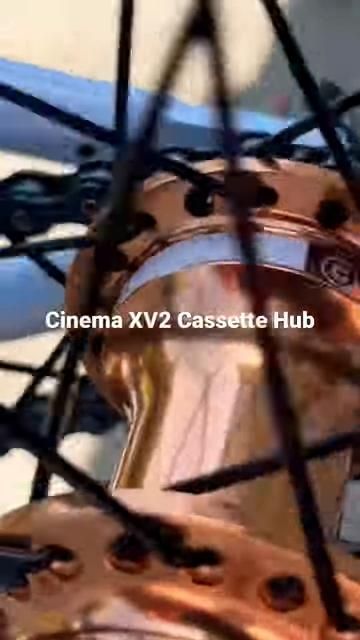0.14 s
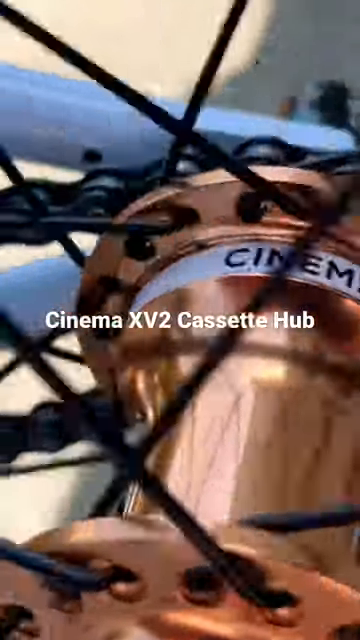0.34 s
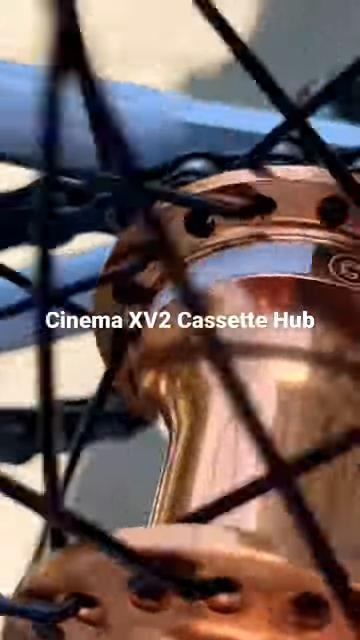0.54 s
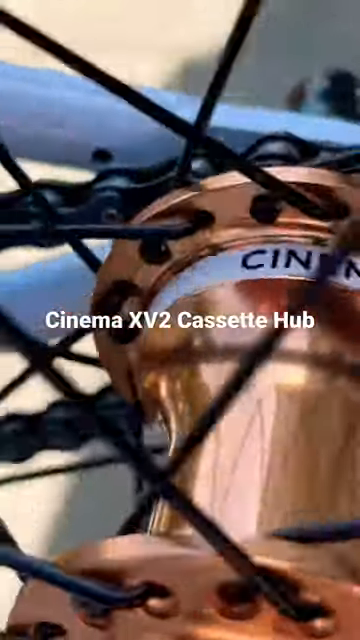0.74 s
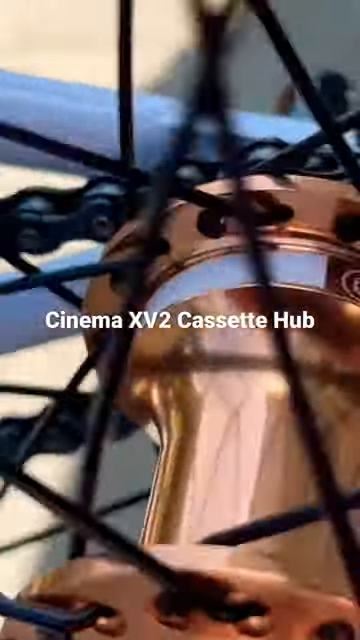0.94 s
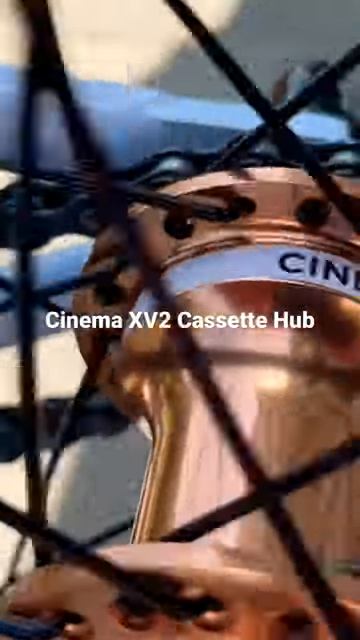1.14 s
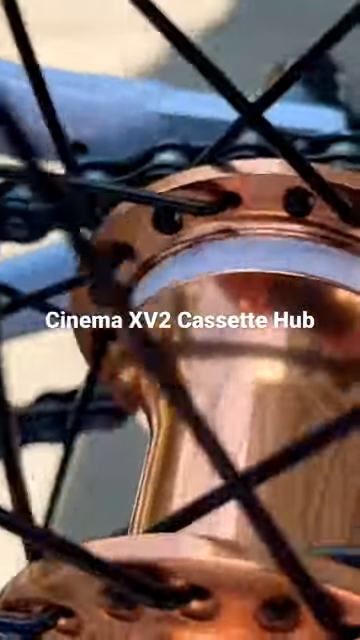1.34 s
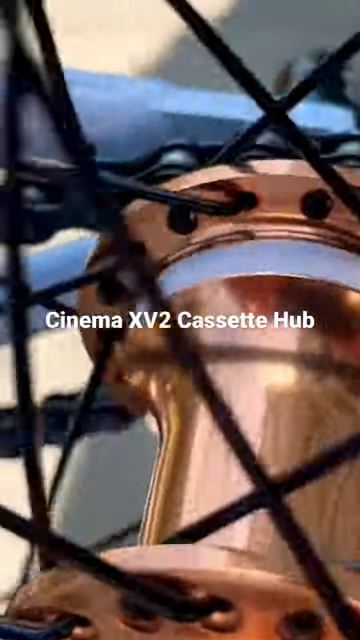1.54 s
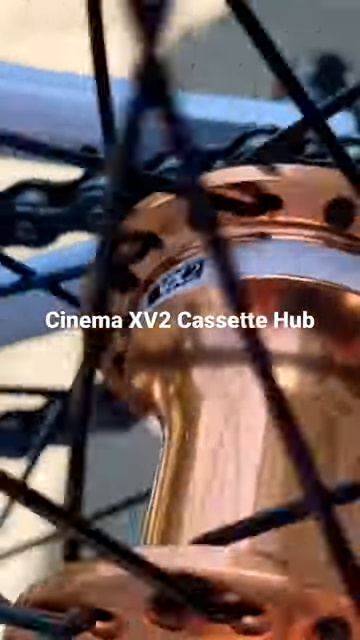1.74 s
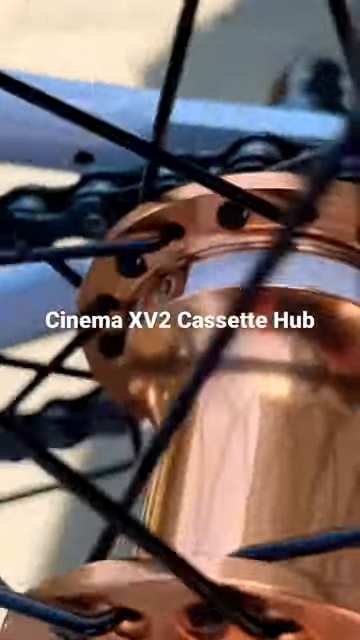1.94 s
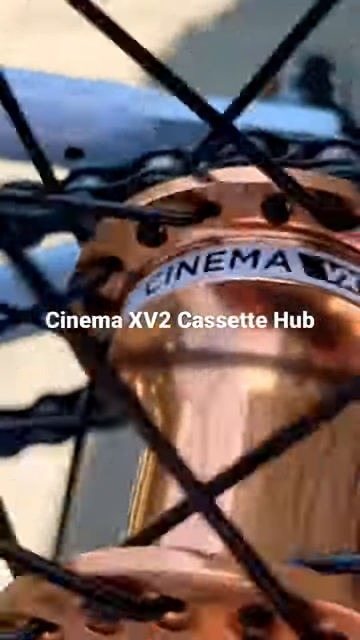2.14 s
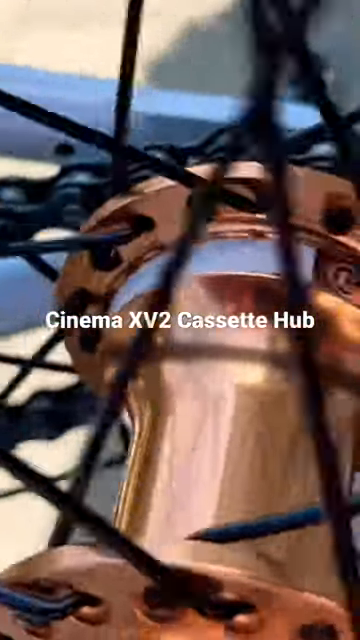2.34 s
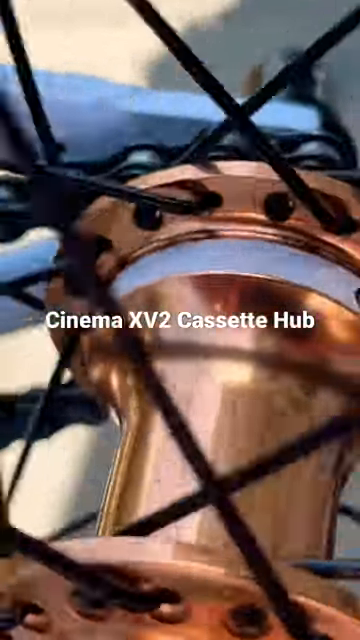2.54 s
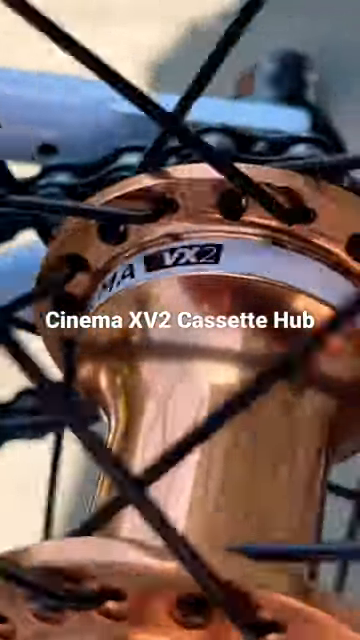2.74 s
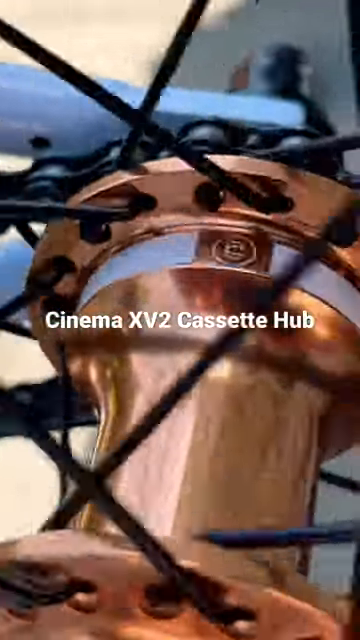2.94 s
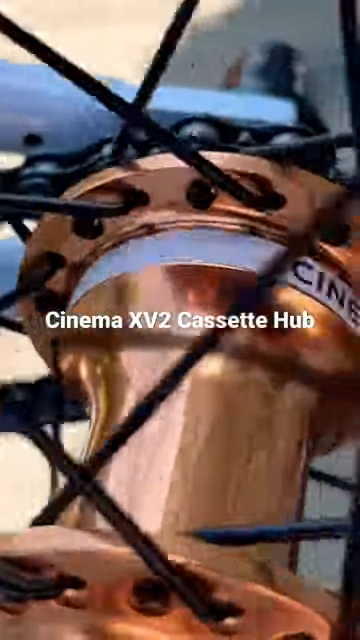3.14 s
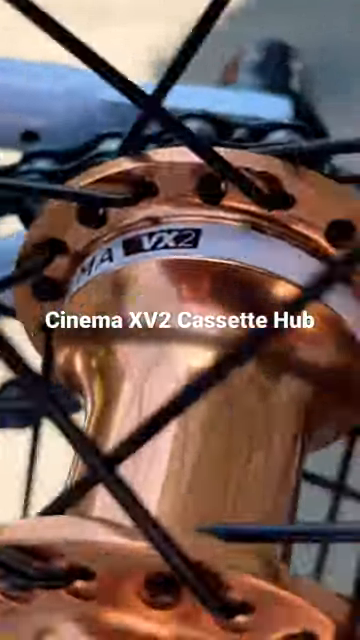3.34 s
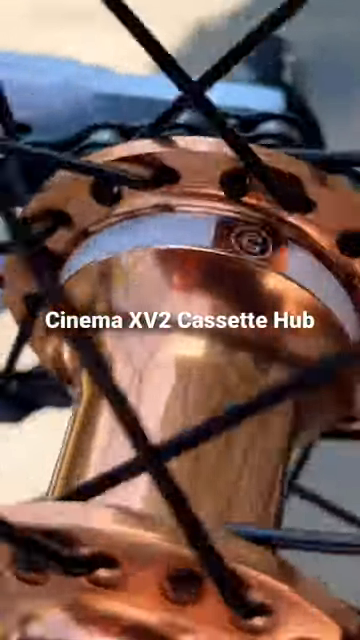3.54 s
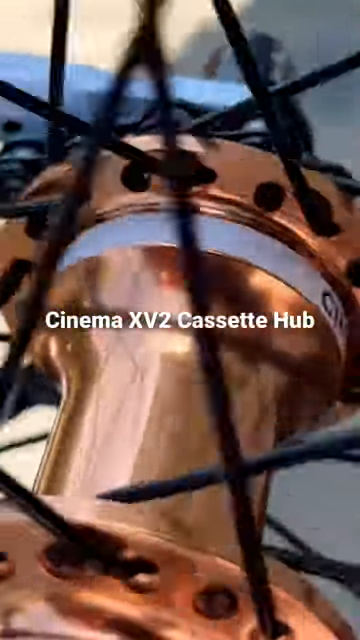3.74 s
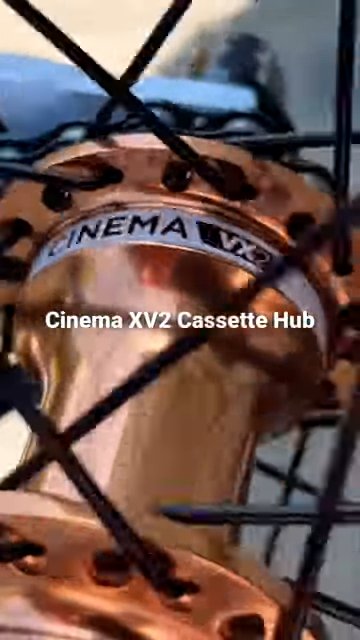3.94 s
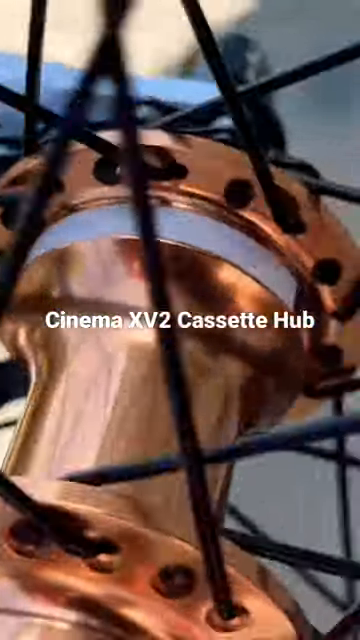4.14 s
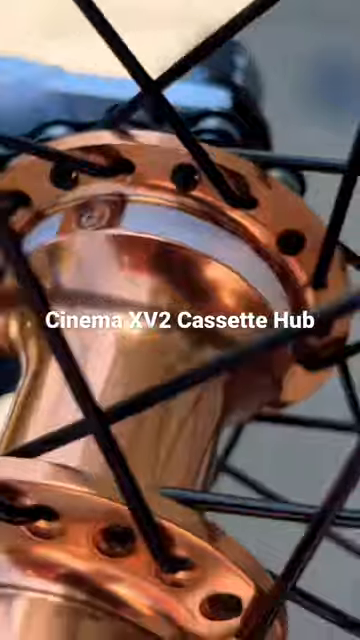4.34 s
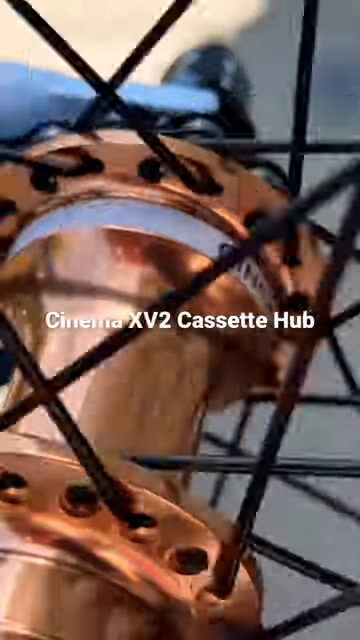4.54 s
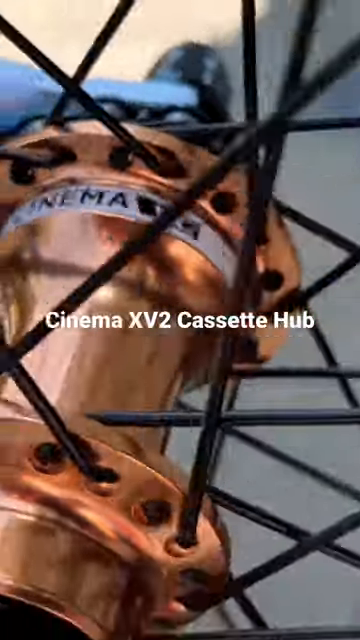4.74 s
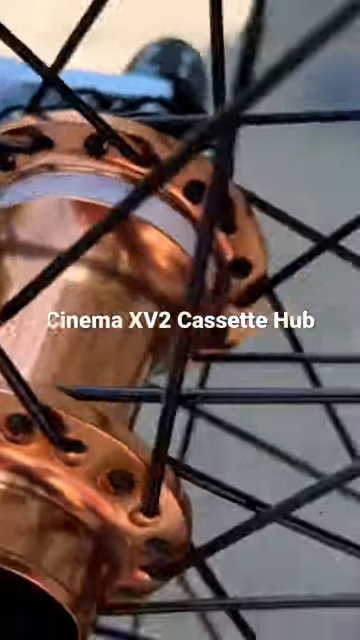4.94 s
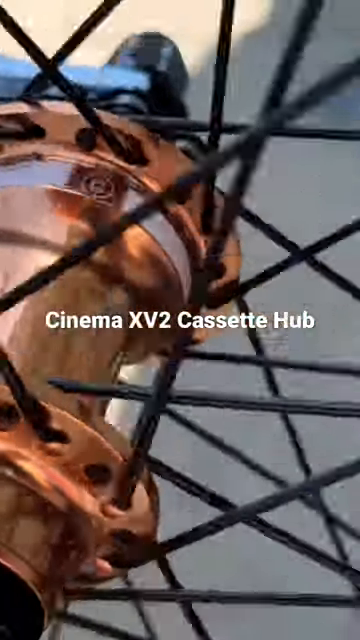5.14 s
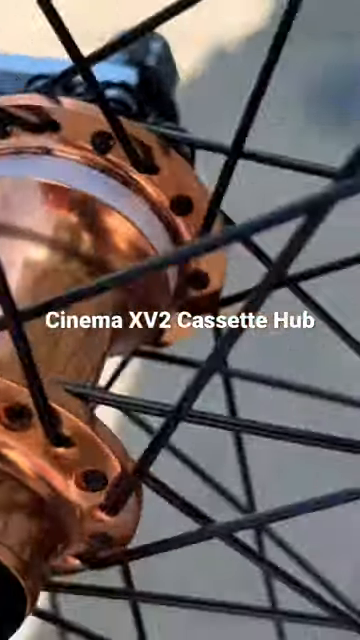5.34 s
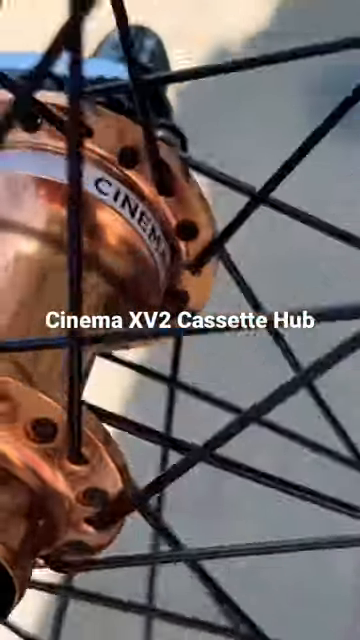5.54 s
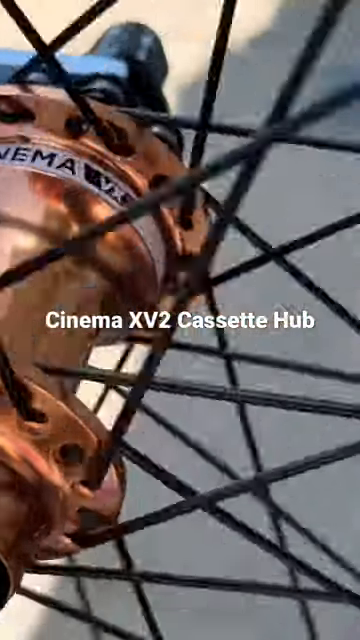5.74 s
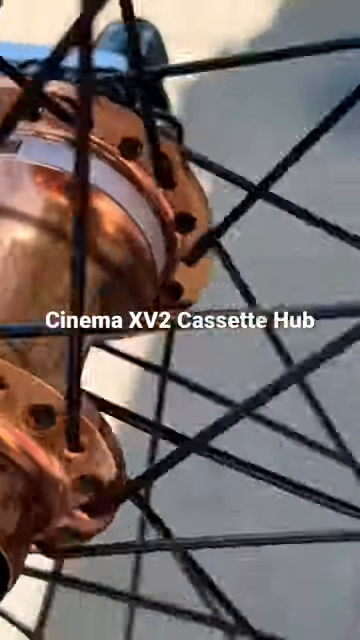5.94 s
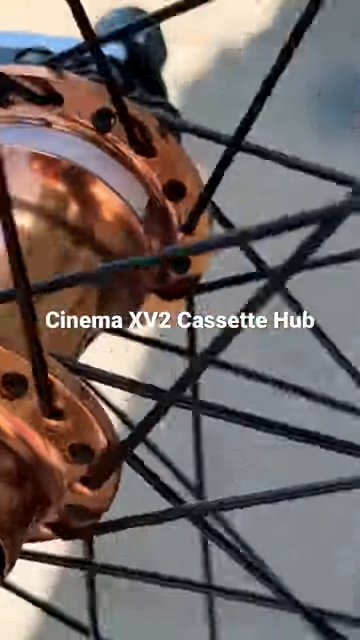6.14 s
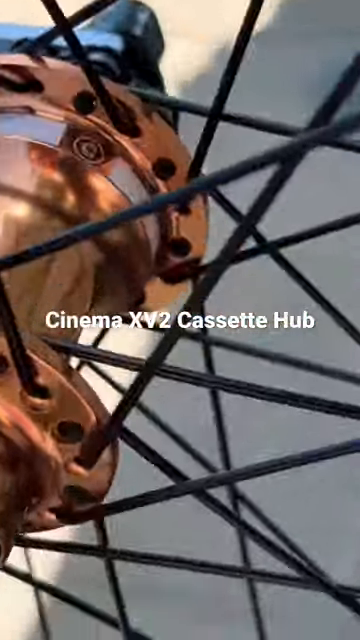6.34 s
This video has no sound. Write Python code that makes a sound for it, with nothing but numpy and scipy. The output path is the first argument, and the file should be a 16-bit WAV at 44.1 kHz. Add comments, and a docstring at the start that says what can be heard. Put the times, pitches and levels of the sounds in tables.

```python
"""A freewheel buzz slows into separate clicks: a lifted bicycle rear wheel coasts down, outdoors.
A phone is held a hand's width from the hub. Three sprung pawls drop off each tooth of an off-centre ratchet ring.
Each drop is filtered noise: a snap, a shell ring and a spoke tail, with a bounce and short sine notes of the hub.
Marked teeth and wheel angle bring a pattern round each turn. Behind it lie shaped noises: a tyre brush,
soft bumps of the hand on the phone, and a low outdoor rumble over a hush."""
import sys
import numpy as np
from scipy import signal
from scipy.fft import rfft, irfft, next_fast_len
from scipy.io import wavfile
from scipy.ndimage import uniform_filter1d

SR = 44100
rng = np.random.default_rng(int(sys.argv[2]) if len(sys.argv) > 2 else 0)


def wrap_up_sound(samples):
    """Save the sound to the file named by the first command line argument, as 16-bit audio."""
    columns = np.atleast_2d(samples).T
    # keep every value between -1 and 1, then stretch to whole-number steps
    tamed = np.clip(columns, -1, 1)
    steps = np.round(tamed * 32767).astype(np.int16)
    wavfile.write(sys.argv[1], SR, steps)


N = 281819  # length of the take (samples)

# Coasting: first speed (teeth/s), dry friction (teeth/s^2), air drag (share of the speed per s)
START_SPEED, FRICTION, AIR_DRAG = 64.7775, 6.9089, .02342
# Uneven pulls of a heavy spot and tight bearings: [rate/per turn, pull/(teeth/s^2), phase/turns]
PULLS = [(1, 1.1, .102), (2, 3.48, .008)]

# Ratchet: pawl places at the start (teeth), ring's off-centre throw (teeth) and its direction (turns)
TEETH = 24
PAWL_SEAT, OFF_CENTRE, OFF_ANGLE = (.763, .775, .751), .022, -.05
# Speed at which a sliding pawl lands half as hard (teeth/s)
SOFT_SPEED = 18.5
# Spread between worn teeth and from click to click (dB)
WEAR_DB, CLICK_SCATTER_DB = .8, .8
# Below this speed (teeth/s) later pawls of a slow click strike harder, by this step per pawl (dB)
CRAWL_SPEED, CRAWL_LATE_DB = 17.6, 2.5
# Clicks that stand out harder: [t/s, lift/dB]
HARD_CLICKS = [(.184, 3.4), (.263, 2.5), (1.595, 3), (2.425, 2), (2.987, 2.8), (3.535, 5), (4.061, 2),
               (4.188, 5), (4.253, 4.2)]
# Slow clicks heard singly: [t/s, tick level/dB, first to last pawl/s, note level/dB, note f/Hz, upper note f/Hz]
SLOW_CLICKS = [(4.319, -3.5, 0.00035, -27.5, 2314, 3820), (4.3518, -3, 0.0005, -28, 2360, 3700),
               (4.3856, -3, 0.00031, -33, 2270, 3850), (4.4193, -7, 0.001, -28, 2450, 3780),
               (4.454, -5, 0.0002, -30, 2490, 3550), (4.4881, -4.2, 0.000065, -29, 2360, 3600),
               (4.523, -1, 0.00097, -32, 2460, 3400), (4.5587, -0.5, 0.0011, -32, 2550, 3820),
               (4.594, -1.5, 0.00098, -34, 2500, 3530), (4.629, -3, 0.00041, -42, 2320, 3220),
               (4.665, -1.7, 0.00084, -37, 2240, 3800), (4.7012, -4.5, 0.0016, -47, 2380, 4050),
               (4.738, -3, 0.001, -31, 2260, 3560), (4.7742, -4.5, 0.0019, -30.5, 2220, 3230),
               (4.8118, -1, 0.0013, -46, 2360, 3600), (4.8487, -3.5, 0.0015, -44, 2330, 3620),
               (4.888, -3, 0.002, -30, 2270, 3130), (4.9262, -2.8, 0.0013, -29, 2236, 3230),
               (4.966, -3, 0.0013, -30, 2170, 2900), (5.0068, -4, 0.0018, -31, 2200, 3300),
               (5.0475, -4, 0.0016, -34, 2210, 4340), (5.0887, -3.5, 0.0011, -29.5, 2366, 3180),
               (5.1308, -4.5, 0.00023, -38, 2300, 4200), (5.173, -2, 0.00036, -41, 2600, 3560),
               (5.2143, -4.5, 0.00048, -28, 2310, 3600), (5.258, -6, 0.00091, -37, 2470, 3470),
               (5.3016, -1.5, 0.00027, -39, 2470, 4400), (5.346, -4.5, 0.00043, -29.5, 2470, 3680),
               (5.3912, -4, 0.00018, -41, 2470, 4500), (5.4367, -3.5, 0.00079, -38, 2510, 3600),
               (5.4837, -4.5, 0.0017, -33, 2153, 4560), (5.5305, -2.5, 0.0011, -45, 2470, 4440),
               (5.579, -3.5, 0.00095, -34, 2520, 3750), (5.6273, -4.5, 0.0012, -40, 2220, 3300),
               (5.676, -5.5, 0.00078, -46, 2210, 3280), (5.7254, -3.5, 0.0014, -40, 2240, 4430),
               (5.776, -3, 0.00061, -48, 2600, 4200), (5.8268, -5.5, 0.0022, -53, 2170, 4010),
               (5.8793, -3.5, 0.0016, -49, 2370, 4530), (5.933, -4, 0.0035, -53, 2300, 3340),
               (5.9881, -6, 0.0018, -30, 2190, 3080), (6.0458, -2.5, 0.0027, -37, 2210, 3170),
               (6.106, -3, 0.0034, -37, 2110, 3750), (6.1683, -3, 0.0024, -39, 2300, 2970),
               (6.233, -5, 0.002, -50, 2550, 2880), (6.2985, -4.5, 0.0019, -29.5, 2360, 2980),
               (6.3652, -3, 0.00094, -47, 2230, 3740)]
# Teeth with their own voice each turn:
# [tooth, spoke ring lift/dB, note level/dB, note f/Hz, upper note level/dB, upper note f/Hz]
MARKED_TEETH = [(2, -1, -35, 2680, -40, 2880), (6, .5, -33, 2300, -38, 3200), (7, 1, -37, 2260, -29, 3130),
                (9, -4, -42, 2350, -40, 3600), (10, -6, -46, 2300, -42, 3900),
                (11, 3, -26.5, 2320, -29, 3620), (12, 1, -31, 2325, -33, 4250),
                (13, -4, -42, 2410, -36, 3800), (14, -.5, -38, 2410, -27, 3850),
                (15, 0, -30.5, 2440, -38, 3800), (16, .5, -31.5, 2620, -38, 3700),
                (17, 1.5, -32, 2570, -29, 3830), (18, -2.5, -40, 2500, -33, 4030),
                (20, 0, -35, 2540, -29, 3600), (23, .5, -31, 2120, -36, 3750)]

# Time constant of a pawl tip's chatter as it lands (s)
CHATTER_S = .0002
# Second contact: earliest and latest delay (s), level against the first tick (dB), its spread (dB)
BOUNCE_S, BOUNCE_DB, BOUNCE_SCATTER_DB = (.0018, .0042), -14, 5
# Tick returned by the ground: delay (s), level against the tick (dB)
GROUND_S, GROUND_DB = .0098, -20
# Spoke ring: spread from drop to drop (dB), how closely it follows the tick (0 not at all, 1 fully)
RING_SCATTER_DB, RING_FOLLOW = 2.2, .28
# Resonances of hub, cassette and spokes, each layer weights the lift: [f/Hz, width/Hz, lift/dB]
WHEEL_MODES = [(580, 35, -2.5), (500, 200, -2), (790, 300, -1.5), (1045, 130, 5), (1185, 60, -6),
               (1309, 90, 8.5), (1410, 100, 3.5), (1635, 90, 5), (1850, 240, 3.2), (2110, 200, 3.6),
               (2312, 240, 3), (2502, 220, 4.4), (3130, 220, 4.8), (3765, 560, 4.5), (4330, 260, 2.5),
               (5190, 480, 6.5), (6250, 700, 1.8), (10500, 1100, 5), (12420, 580, -16), (13700, 590, -5.5)]
# Relative colour of the snap: [f/Hz, level/dB]
SNAP_COLOUR = [(120, -57.5), (1000, -33), (2000, -23.5), (3500, -9.5), (4700, -17.5), (6000, -18),
               (7300, -7.5), (8500, -1.5), (10500, -5), (11600, -8.5), (12500, -7), (14000, -14),
               (15500, -8)]
# Relative colour of the hub shell's ring: [f/Hz, level/dB]
SHELL_COLOUR = [(120, -35.5), (300, -19), (860, -13), (1050, -15.5), (1500, -20.5), (2200, -28.5),
                (2800, -2), (3700, -15), (4700, -9.5), (6800, -2), (8500, 3), (10500, -5), (12500, 6),
                (15500, -8)]
# Relative colour of the spokes' tail: [f/Hz, level/dB]
SPOKE_COLOUR = [(120, -43.5), (300, -19.5), (700, -19.5), (860, -25), (1050, -18.5), (1500, -19),
                (1900, -5.5), (2300, 1), (2800, -3.5), (4200, -2), (4800, -7), (6800, -5), (8500, -58),
                (12000, -2), (15500, -15)]
# Ring time of the spokes: [f/Hz, t60/s]
SPOKE_T60 = [(300, 0.16), (1200, 0.13), (2300, 0.21), (3500, 0.12), (6000, 0.023), (14000, 0.1)]
# Share of the ring's power common to every wheel angle: [f/Hz, share/0-1]
STEADY_SHARE = [(300, .3), (700, .65), (950, .96), (1200, .94), (1500, .55), (2200, .1), (4000, 0)]

# Hub note in the buzz: mean pitch (Hz), spread (share), level (dB), spread of level (dB)
NOTE_HZ, NOTE_SPREAD, NOTE_DB, NOTE_SCATTER_DB = 2300, .06, -36, 1.5
# Its upper note: mean pitch (Hz), spread (share), spread of level (dB)
UPPER_HZ, UPPER_SPREAD, UPPER_SCATTER_DB = 3780, .025, 2.5
# Pitch stray of both notes from click to click (share)
NOTE_WAVER = .012
# Ring times (t60, s) and time constant of their build-up (s)
NOTE_T60, UPPER_T60, NOTE_ATTACK_S = .1, .045, .001
# Bright zing: centre and width (Hz)
ZING_HZ, ZING_WIDTH = 5170, 560
# Lift of the zing as it comes and goes: [t/s, lift/dB]
ZING_LIFT = [(0, 2.5), (.35, 4.5), (.7, -1.5), (1.7, -3), (2.7, -.5), (3.7, 1), (4.05, 4.5), (4.4, .5),
             (5, .5), (5.6, 3.5), (6.39, 2)]
# Low ring once a turn: centre, width (Hz); angle, half-span to 1/e (turns); lift (dB)
TURN_HZ, TURN_WIDTH, TURN_ANGLE, TURN_SPAN, TURN_DB = 1110, 50, .92, .14, 3.5

# Tyre brush: angle and half-span to 1/e (turns); speeds of no and of full contact (teeth/s)
BRUSH_ANGLE, BRUSH_WIDTH, BRUSH_FREE, BRUSH_FULL = .675, .07, 44, 48.5
# Late swell of the same hum: (t/s, half-length to 1/e/s, level/dB)
LATE_HUM = (4.8, 0.1, -60)
# Relative colour of the tyre's hollow note: [f/Hz, level/dB]
TYRE_COLOUR = [(100, -39), (200, -12), (245, 1), (292, 9), (345, 4), (420, -20), (700, -56)]
# Soft bumps of the hand on the phone: [t/s, half-length to 1/e/s, f/Hz, level/dB]
BUMPS = [(.2, .06, 100, -53), (.42, .04, 140, -58), (1.08, .04, 105, -53), (2.05, .06, 55, -52),
         (2.53, .04, 50, -49), (2.66, .04, 50, -52), (3.1, .025, 150, -56), (4.6, .1, 100, -56),
         (4.95, .05, 60, -54), (5.75, .04, 55, -55)]
# Relative colour of the distant rumble: [f/Hz, level/dB]
RUMBLE_COLOUR = [(20, -48), (35, -21), (50, 1.5), (75, -2.5), (110, -3.5), (200, -11), (400, -16.5),
                 (2000, -17), (6000, -24), (16000, -32.5)]
# Rumble over the take: [t/s, level/dB]
RUMBLE_LEVEL = [(0, -47), (.8, -50.5), (1.2, -50.5), (2.6, -50.5), (3.3, -51.5), (4.2, -51), (4.7, -51),
                (5.2, -51), (6.39, -53.5)]
# Chance swell of the rumble: spread (dB), new levels per second
SWELL_DB, SWELL_RATE = .6, 3.08
# Relative colour of the steady open-air hush: [f/Hz, level/dB]
HUSH_COLOUR = [(40, 10.5), (150, -12), (290, 9), (420, -13), (500, -32), (560, 9.5), (620, 4), (685, 1.5),
               (860, -14), (1050, 1.5), (3000, -2.5), (15000, -37)]

# The phone's two microphone ports: [f/Hz, left lead/rad, left minus right/dB, diffuse likeness/0-1]
PORTS = [(80, 0, 0, .9), (160, 0, 0, .4), (260, .1, .5, .2), (500, .8, .7, .1), (1400, 1.3, 2.5, .1),
         (2400, .65, 2.6, .72), (3200, 1.3, 3, .4), (4200, .2, 3.2, .55), (5600, -1.2, 1.7, .35),
         (6800, -1.9, .8, .3), (8300, -3.1, 0, .98), (10000, -4.6, 0, .45), (11800, -6.2, 0, .93),
         (13000, -6.9, 0, .7), (13700, -8, 0, .4), (14300, -9.15, 0, .95), (15500, -9.4, 0, .99)]
CUT_HZ = 15750  # top of the phone's band


def freewheel(when, angle, strength, level_db=-3.5, wobble=.016):
    """Pawl drops ring the wheel, whose sound shifts with the pawl's angle; each pawl bounces once."""
    responses = wheel_responses()
    count = len(responses)
    tooth_db = np.zeros(TEETH)
    for tooth, ring_db, *_ in MARKED_TEETH:
        tooth_db[tooth] = ring_db
    drop_db = np.repeat(np.resize(tooth_db, len(when)), len(PAWL_SEAT))
    # a loose pawl varies in contact point, grip on the spokes and bounce
    chance = rng.standard_normal((when.size, 3))
    contacts = count * (angle.ravel() + wobble * chance[:, 0])
    grips = undb(drop_db + RING_SCATTER_DB * chance[:, 1])
    bounces = undb(BOUNCE_DB + BOUNCE_SCATTER_DB * chance[:, 2])
    lags = (SR * rng.uniform(*BOUNCE_S, when.size)).astype(int)
    starts = (when.ravel() * SR).astype(int)
    out = np.zeros((2, N + 2 * responses.shape[-1]))
    drops = zip(starts, contacts, strength.ravel(), grips, bounces, lags)
    for start, contact, blow, grip, bounce, lag in drops:
        # crossfade between the two nearest angles at constant power
        k = int(np.floor(contact))
        blend = np.pi / 2 * (contact % 1)
        here, ahead = responses[k % count], responses[(k + 1) % count]
        tick, ring = np.cos(blend) * here + np.sin(blend) * ahead
        out[:, start:start + ring.shape[1]] += blow * tick + blow ** RING_FOLLOW * grip * ring
        again = start + lag
        out[:, again:again + tick.shape[1]] += bounce * blow * tick
    return undb(level_db) * out[:, :N]


def pawl_drops(speed, travel, scatter_db=1.5, late_db=-.14, jitter_s=.00004):
    """Time, wheel angle (turns) and strength of every drop; one row a tooth, one column a pawl."""
    t = np.arange(N) / SR
    tooth = np.arange(int(travel[-1]) + 1)[:, None]
    angle = tooth / TEETH + np.arange(len(PAWL_SEAT)) / len(PAWL_SEAT)
    # the off-centre ring lets the pawls take turns to lead; their flam widens as the wheel slows
    place = tooth + np.array(PAWL_SEAT) + OFF_CENTRE * np.sin(2 * np.pi * (angle + OFF_ANGLE))
    when = np.interp(place, travel, t, right=N) + jitter_s * rng.standard_normal(place.shape)
    rank = place.argsort(axis=1).argsort(axis=1)  # order of landing
    wear_db = WEAR_DB * rng.standard_normal(TEETH)
    click_db = CLICK_SCATTER_DB * rng.standard_normal(tooth.shape)
    db = wear_db[tooth % TEETH] + click_db + late_db * rank
    for s, hard_db in HARD_CLICKS:
        db[np.argmin(abs(when[:, 0] - s))] += hard_db
    # a slow pawl slides down its tooth instead of dropping
    force = 1 / (1 + (SOFT_SPEED / np.interp(when, t, speed)) ** 2)
    strength = force * undb(db + scatter_db * rng.standard_normal(place.shape))
    # slow clicks take their own times and levels
    for s, tick_db, flam_s, *_ in SLOW_CLICKS:
        k = np.argmin(abs(when[:, 0] - s))
        step_db = CRAWL_LATE_DB if np.interp(s, t, speed) < CRAWL_SPEED else late_db
        when[k] = s + abs(flam_s) * rank[k] / 2
        strength[k] = undb(tick_db + late_db + step_db * (rank[k] - 1.5))
    heard = when.max(axis=1) < (N - 1) / SR
    return when[heard], angle[heard], strength[heard]


def coast():
    """Speed (teeth/s) under friction and air, and travel (teeth) swayed by pulls that tell more when slow."""
    t = np.arange(N) / SR
    knee = FRICTION / AIR_DRAG
    speed = (START_SPEED + knee) * np.exp(-AIR_DRAG * t) - knee
    travel = np.cumsum(speed) / SR
    sway = 0
    for k, pull, phase in PULLS:
        rate = 2 * np.pi * k * speed / TEETH  # radians per second
        sway = sway + pull / rate ** 2 * np.sin(2 * np.pi * k * (travel / TEETH + phase))
    return speed, travel + sway


def wheel_responses(count=24, size=11):
    """Tick and ring from each wheel angle, mixed with a common part filtered to their mean colour."""
    angles = rfft(np.array([drop_response() for _ in range(count)]))
    frame = drop_response()

    def power(spectrum):
        """Power smoothed over neighbouring bins."""
        return uniform_filter1d(abs(spectrum) ** 2, size) + 1e-9

    match = np.sqrt(power(angles).mean(axis=0) / power(rfft(frame)))
    common = rfft(frame) * causal(match)
    steady = np.clip(curve(STEADY_SHARE, bins(frame)), 0, 1)
    return irfft(common * np.sqrt(steady) + angles * np.sqrt(1 - steady))


def drop_response(snap_db=-1.78, shell_db=-4.0, spokes_db=-6.5, shell_s=.0023, size=8192):
    """One pawl drop: a tick of snap, shell and ground echo, and the spokes' longer ring."""
    t = np.arange(size) / SR
    lift_db = resonances(bins(t))
    chatter = rng.standard_normal(size) * t * np.exp(-t / CHATTER_S)
    snap = metal(chatter, SNAP_COLOUR, .39 * lift_db)
    burst = diffuse(rng.standard_normal((2, size))) * np.exp(-t / shell_s)
    shell = metal(burst, SHELL_COLOUR, 1.67 * lift_db)
    spokes = metal(diffuse(fading_noise(t, SPOKE_T60)), SPOKE_COLOUR, 1.32 * lift_db)
    tick = undb(snap_db) * snap + undb(shell_db) * shell
    echo = np.pad(tick, ((0, 0), (int(GROUND_S * SR), 0)))[:, :size]
    return np.array([tick + undb(GROUND_DB) * echo, undb(spokes_db) * spokes])


def resonances(hz, wander=.015, scatter_db=3.5):
    """Lift (dB) of the modes from one angle: the turning spokes shade and shift each a little."""
    lift_db = 0
    for f, width, db in WHEEL_MODES:
        shade, shift = rng.standard_normal(2)
        offset = 2 * (hz - f * (1 + wander * shift)) / width
        lift_db = lift_db + (db + scatter_db * shade) / (1 + offset ** 2)
    return lift_db


def metal(x, colour, lift_db, spread_s=.000605):
    """Causal filter of unit output energy: a broad colour with resonances standing out of it."""
    hz = bins(x)
    # low bending waves travel more slowly, so the ring arrives just after the tick
    delay_s = spread_s / (1 + (hz / 4000) ** 2)
    late = np.exp(-2j * np.pi * np.cumsum(delay_s) * hz[1])
    return unit(irfft(rfft(x) * causal(undb(curve(colour, hz) + lift_db)) * late))


def fading_noise(t, t60_table):
    """A crowd of close modes: noise whose octave bands each die at their own rate."""
    noise = rfft(rng.standard_normal((2, len(t))))
    octave = np.log2(np.clip(bins(t), 250, 16000) / 250)
    out = 0
    for k, hz in enumerate(np.geomspace(250, 16000, 7)):
        band = irfft(noise * np.maximum(1 - abs(octave - k), 0))
        out = out + band * np.exp(-np.log(1000) * t / curve(t60_table, hz))
    return out


def hub_notes(when, strength, upper_db=-34, size=6144):
    """Each click excites close hub modes: two damped sines, varied in the buzz and set singly when slow."""
    t = np.arange(size) / SR
    swell = 1 - np.exp(-t / NOTE_ATTACK_S)
    out = np.zeros(N + size)

    def add(s, hz, db, t60):
        """One damped note of random phase."""
        fade = np.exp(-np.log(1000) * t / t60)
        start = int(s * SR)
        out[start:start + size] += undb(db) * swell * fade * np.sin(2 * np.pi * (hz * t + rng.random()))

    marked = {tooth: notes for tooth, _, *notes in MARKED_TEETH}
    for k, (s, blow) in enumerate(zip(when.mean(axis=1), strength.max(axis=1))):
        pitch, level, upper_pitch, upper_level = rng.standard_normal(4)
        tick_db = 20 * np.log10(blow)
        if s + 1 / START_SPEED < SLOW_CLICKS[0][0]:
            plain_hz = NOTE_HZ * (1 + NOTE_SPREAD * pitch)
            plain_upper_hz = UPPER_HZ * (1 + UPPER_SPREAD * upper_pitch)
            plain = NOTE_DB, plain_hz, upper_db, plain_upper_hz
            note_db, note_hz, high_db, high_hz = marked.get(k % TEETH, plain)
            note_db = note_db + RING_FOLLOW * tick_db + NOTE_SCATTER_DB * level
            high_db = high_db + tick_db + UPPER_SCATTER_DB * upper_level
            add(s, note_hz * (1 + NOTE_WAVER * upper_pitch), note_db, NOTE_T60)
            add(s, high_hz * (1 + NOTE_WAVER * pitch), high_db, UPPER_T60)
    for s, tick_db, _, note_db, note_hz, upper_hz in SLOW_CLICKS:
        add(s, note_hz, note_db, NOTE_T60)
        add(s, upper_hz, tick_db + upper_db, UPPER_T60)
    return out[:N]


def zing(x, travel):
    """A bright resonance swells and fades over time; a low one comes round with every turn."""
    bright_db = np.interp(np.arange(N) / SR, *np.transpose(ZING_LIFT))
    bright = lift(x, ZING_HZ, ZING_WIDTH, bright_db)
    turn_db = TURN_DB * once_a_turn(travel, TURN_ANGLE, TURN_SPAN)
    return lift(bright, TURN_HZ, TURN_WIDTH, turn_db)


def lift(x, hz, width, db):
    """Raise or lower one resonance of a sound by a changing number of dB."""
    return x + (undb(db) - 1) * signal.lfilter(*signal.iirpeak(hz, hz / width, fs=SR), x)


def once_a_turn(travel, angle, span):
    """A swell from 0 to 1 and back each time the wheel passes one angle."""
    turns_away = (travel / TEETH - angle + .5) % 1 - .5
    return np.exp(-(turns_away / span) ** 2)


def tyre_brush(speed, travel, level_db=-53.5):
    """A soft noise hum where the wheel runs out of true, gone once it slows, but for one late swell."""
    contact = np.interp(speed, [BRUSH_FREE, BRUSH_FULL], [0, 1])
    touch = once_a_turn(travel, BRUSH_ANGLE, BRUSH_WIDTH) * contact
    s, length_s, hum_db = LATE_HUM
    swell = np.exp(-((np.arange(N) / SR - s) / length_s) ** 2)
    return (undb(level_db) * touch + undb(hum_db) * swell) * air(TYRE_COLOUR)


def hand_bumps():
    """The hand on the phone: short dull swells of octave-band noise, alike before the ports."""
    t = np.arange(N) / SR
    out = np.zeros(N)
    for s, length_s, hz, db in BUMPS:
        shape = np.exp(-((t - s) / length_s) ** 2)
        edges = [hz / np.sqrt(2), hz * np.sqrt(2)]
        band = signal.butter(2, edges, "bandpass", fs=SR, output="sos")
        bump = unit(shape * signal.sosfilt(band, rng.standard_normal(N)))
        out += undb(db) * np.linalg.norm(shape) * bump
    return out


def outdoors(hush_db=-60):
    """Far traffic and light air: a swelling noise rumble over a steady hush."""
    rumble_db = np.interp(np.arange(N) / SR, *np.transpose(RUMBLE_LEVEL)) + SWELL_DB * walk(SWELL_RATE)
    return undb(rumble_db) * air(RUMBLE_COLOUR) + undb(hush_db) * air(HUSH_COLOUR)


def air(colour):
    """Diffuse noise of unit rms with a given colour."""
    noise = rng.standard_normal((2, 2 * next_fast_len(N // 2 + 1, True)))
    coloured = irfft(rfft(noise) * undb(curve(colour, bins(noise))))
    return np.sqrt(N) * unit(diffuse(coloured)[:, :N])


def walk(rate):
    """Slow chance: normal random levels, so many a second, joined by lines."""
    place = np.arange(N) / SR * rate
    levels = rng.standard_normal(1024)
    return np.interp(place, np.arange(len(levels)), levels)


def diffuse(pair):
    """Two unrelated sounds become the partly alike sound at the two ports."""
    alike = np.clip(curve(PORTS, bins(pair), axis=3), 0, 1)
    mid, side = rfft(pair) * np.sqrt([1 + alike, 1 - alike])
    return irfft(np.array([mid + side, mid - side]) / np.sqrt(2), pair.shape[-1])


def causal(gain):
    """Spectrum of the promptest (minimum-phase) filter with these gains."""
    cepstrum = irfft(np.log(gain))
    size = cepstrum.shape[-1]
    return np.exp(rfft(cepstrum * np.r_[1, 2 * (np.arange(1, size) < size // 2)]))


def undb(db):
    """Decibels to gain."""
    return 10 ** (np.asarray(db) / 20)


def curve(table, hz, axis=1):
    """One column of a table, joined on a log-frequency axis."""
    rows = np.array(table, float)
    return np.interp(np.log(hz + 1), np.log(rows[:, 0]), rows[:, axis])


def unit(x):
    """Scale each channel to an energy of one."""
    return x / np.sqrt(np.sum(x ** 2, axis=-1, keepdims=True))


def bins(x):
    """Frequencies (Hz) of a signal's spectrum."""
    return np.fft.rfftfreq(x.shape[-1], 1 / SR)


def scene():
    """Hub, tyre, hand and open air, before the phone's ports."""
    speed, travel = coast()
    when, angle, strength = pawl_drops(speed, travel)
    hub = zing(freewheel(when, angle, strength), travel) + hub_notes(when, strength)
    return hub + tyre_brush(speed, travel) + hand_bumps() + outdoors()


def record(dry, size=4096):
    """The phone's two ports differ in phase and level; a steep low-pass cuts the top."""
    padded = np.pad(dry, ((0, 0), (0, next_fast_len(N + size) - N)))
    hz = bins(padded)
    lead, pan_db = curve(PORTS, hz, axis=1), curve(PORTS, hz, axis=2)
    left = undb(pan_db / 2) * np.exp(1j * lead)
    right = undb(-pan_db / 2)
    heard = irfft(rfft(padded) * np.array([left, right]), padded.shape[-1])[:, :N]
    return signal.sosfilt(signal.ellip(8, .2, 70, CUT_HZ, fs=SR, output="sos"), heard)


dry = scene()
out = record(dry)
wrap_up_sound(out)
```